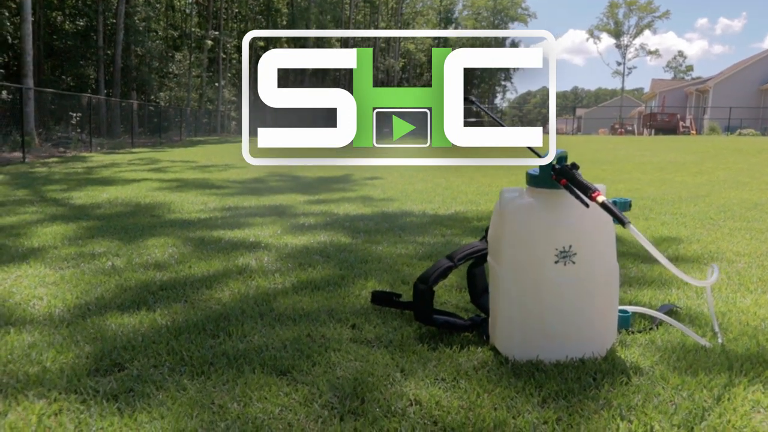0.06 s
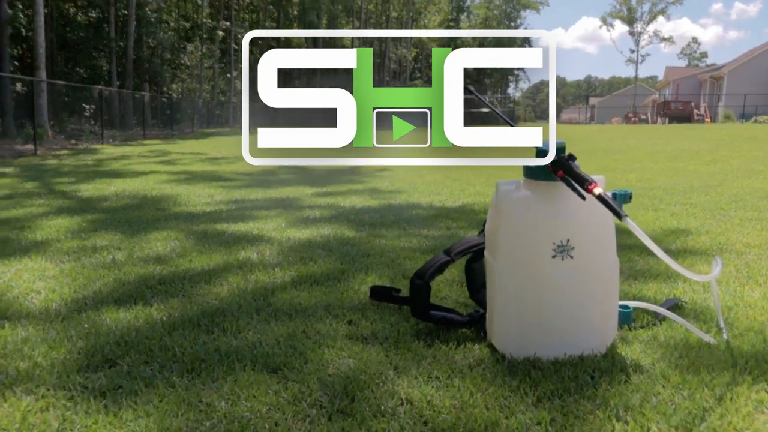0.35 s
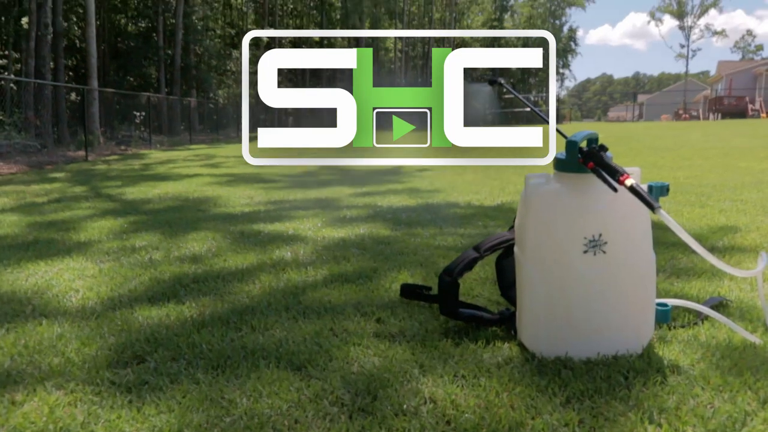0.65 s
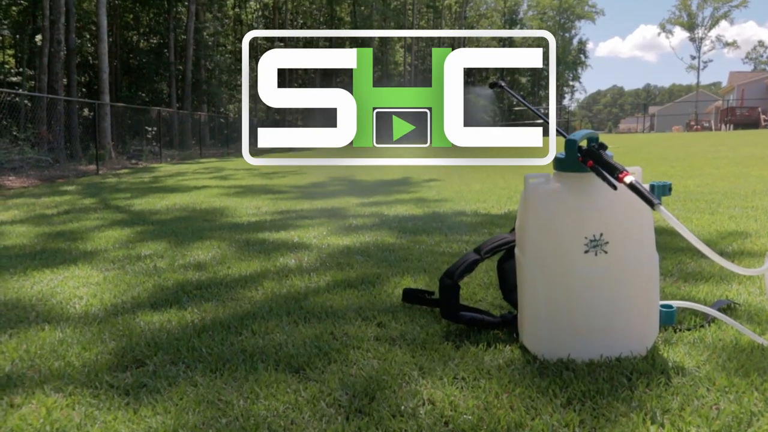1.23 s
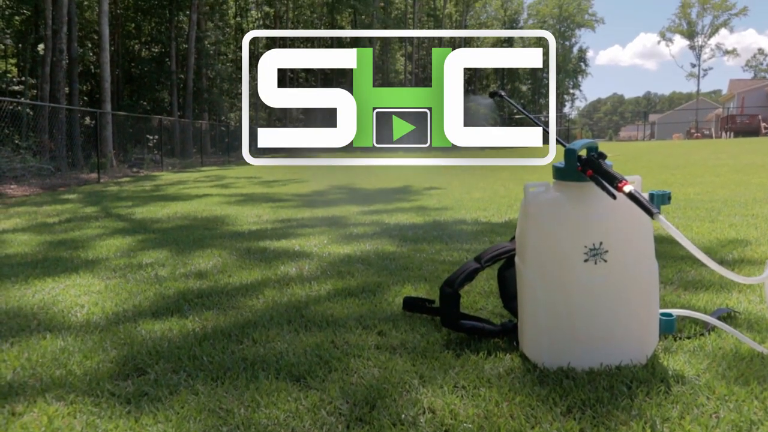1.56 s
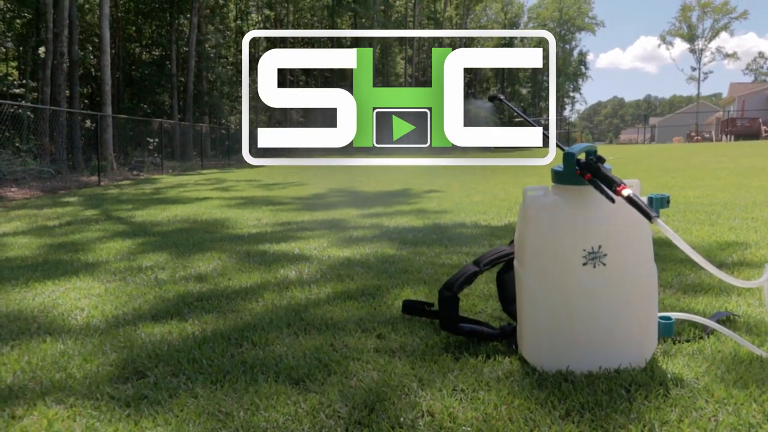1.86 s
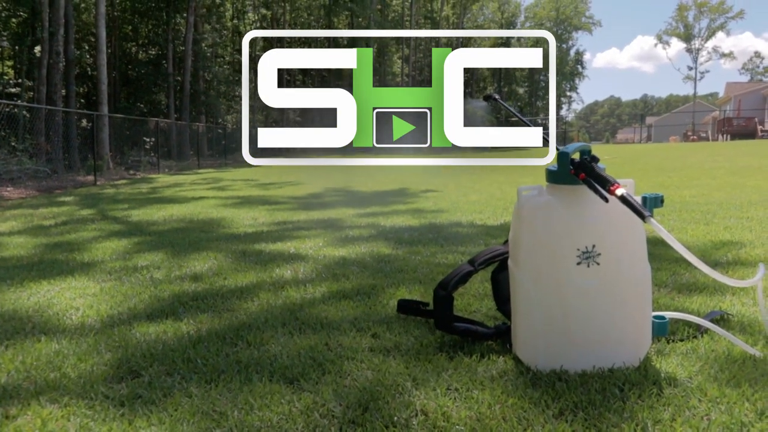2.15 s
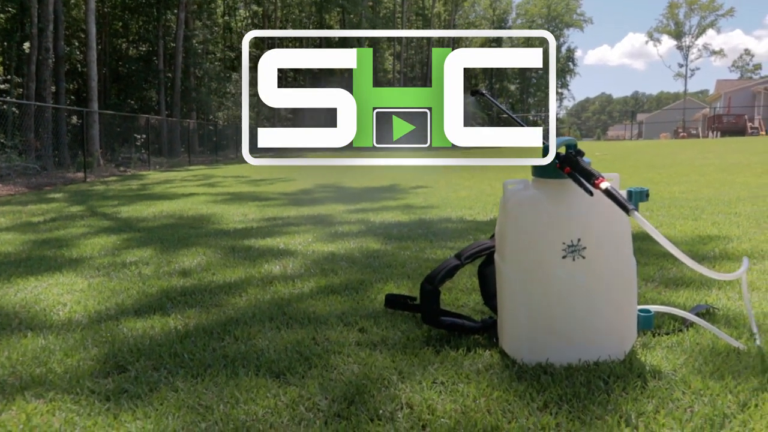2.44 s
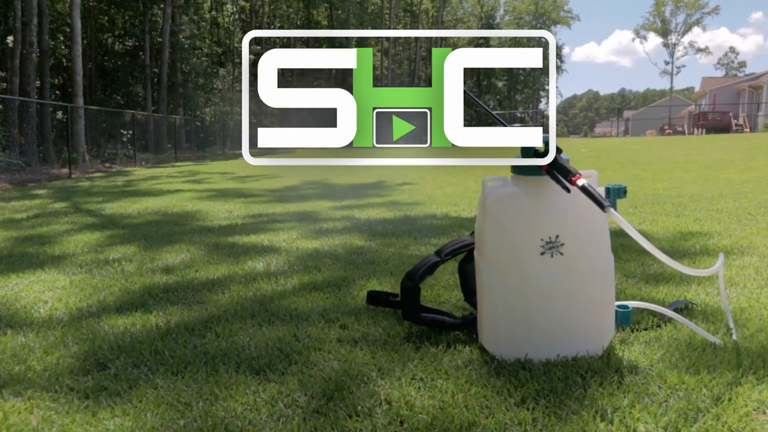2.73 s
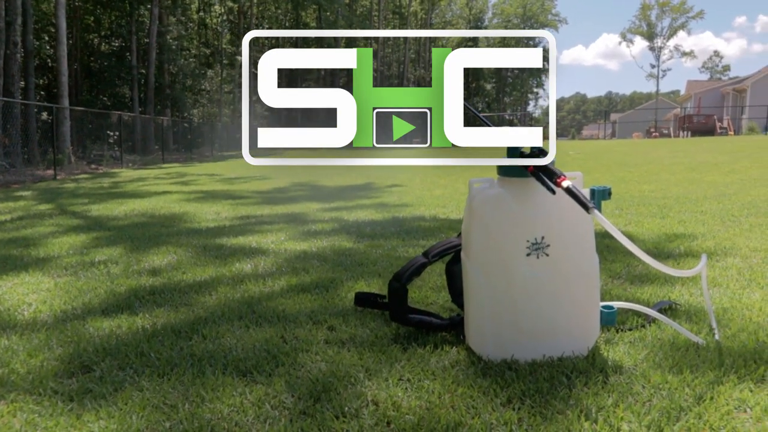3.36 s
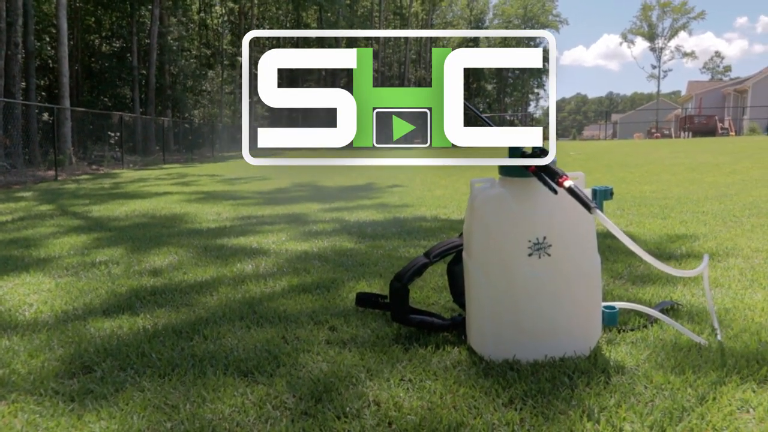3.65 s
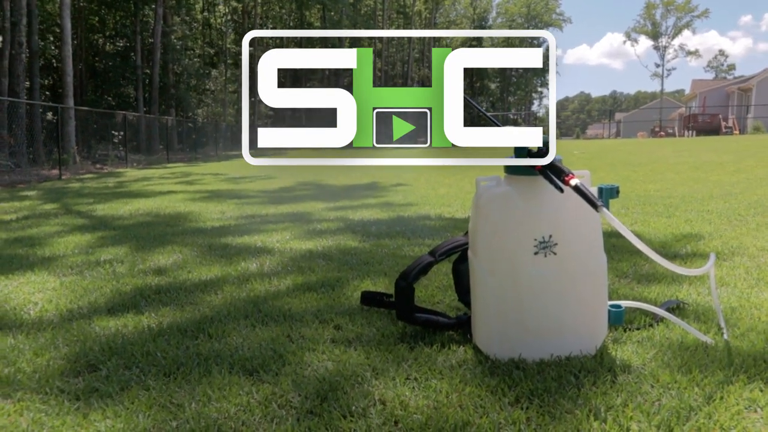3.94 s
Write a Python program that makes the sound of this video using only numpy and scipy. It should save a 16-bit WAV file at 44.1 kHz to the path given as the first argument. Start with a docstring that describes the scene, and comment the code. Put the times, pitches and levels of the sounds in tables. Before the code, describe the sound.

A few steps away on a lawn, the electric pump of a backpack sprayer hums and buzzes without a break. Under it are a soft rush of liquid, a fine hiss from the nozzle and a barely audible breeze.

```python
"""A low hum with a buzzing clatter on top: the electric diaphragm pump of a backpack sprayer,
running steadily on a lawn a few steps away. Each shaft turn shakes the plastic tank.
Liquid rushes through the valves and hisses out of the nozzle, pulsing slightly with the strokes.
A faint second hum and a light breeze lie beneath."""
import sys
import numpy as np
from scipy import signal
from scipy.fft import rfft, irfft
from scipy.io import wavfile
from scipy.ndimage import uniform_filter1d, map_coordinates

SR = 44100
rng = np.random.default_rng(int(sys.argv[2]) if len(sys.argv) > 2 else 0)


def persist_wave(psi):
    """Save psi, clipped to +-1, as 16-bit WAV."""
    counts = np.round(np.clip(psi, -1, 1) * 32767).astype(np.int16)
    wavfile.write(sys.argv[1], SR, np.atleast_2d(counts).T)


N = 176400

SHAFT_HZ, WANDER_SHARE, JITTER_SHARE = 50.754, .00054, .0018
TANK_HZ, TANK_WIDTH_HZ = 558, 62  # strongest tank resonance
HUM_DB, CLATTER_FROM_HZ = .5, 530
WAVER_DB, WAVER_FULL_HZ = 1.5, 925
SPRAY_DB, SPRAY_FROM_HZ, TREBLE_FROM_HZ = -.18, 1930, 6200
FLUTTER_DB, DROPS_PER_S, DROPS_SHARE = .34, 3200, .28

# Breeze puffs. Each row: peak time in seconds, half-width in seconds, level in dB.
GUSTS_S_DB = [(.47, .04, -54), (.61, .05, -51), (1.34, .04, -61), (1.85, .04, -57)]
# Second hum. Each row: frequency in Hz, rms level in dB.
FAINT_HUM_HZ_DB = [(83.8, -64), (167.3, -70)]
# Nozzle hiss spectrum. Each row: frequency in Hz, base density in dB per Hz.
HISS_HZ_DB = [(1800, -90), (2350, -97), (2800, -100), (3350, -99.5), (3650, -101.5), (4000, -100.5),
              (4600, -103), (5200, -104), (5550, -105), (5850, -110.5), (6300, -113), (7100, -108),
              (8400, -108.5), (10400, -112), (12600, -119.5), (15300, -121.5)]
# Lag of the lawn reflection. Each row: time in seconds, lag in milliseconds.
BOUNCE_S_MS = [(0, 1.297), (.5, 1.305), (.8, 1.296), (1.15, 1.264), (2, 1.262), (2.7, 1.247), (4, 1.242)]
# Spray treble trend. Each row: time in seconds, gain in dB.
TREBLE_S_DB = [(0, -1.5), (.3, -0.3), (.65, 0.5), (1.8, 1), (2.4, 0), (3.2, -0.2), (4, 0.5)]
# Brief treble dips. Each row: centre in seconds, depth in dB.
DIPS_S_DB = [(.079, 19), (.634, 16), (2.148, 18), (2.958, 22)]
# Spectrum of liquid in the pump. Each row: frequency in Hz, base density in dB per Hz.
RUSH_HZ_DB = [(25, -86), (70, -83), (180, -83.5), (290, -87.5), (380, -90), (560, -87), (820, -86.5),
              (1050, -91), (1270, -95.5), (1480, -94), (1740, -89.5), (1950, -98.5), (3000, -100)]
# Pump harmonics in the tank. Each row: multiple of the shaft rate, base rms level in dB.
HARMONICS_DB = [(2, -52), (3, -41), (4, -46), (5, -55), (6, -68.5), (7, -57.5), (8, -62.5), (9, -59.5),
                (10, -72), (11, -46), (12, -58.5), (13, -59.2), (14, -69.5), (15, -55), (16, -62.5),
                (17, -56.5), (18, -65), (19, -61), (20, -64), (21, -67.5), (22, -71), (24, -73),
                (26, -78.5), (27, -74.5), (28, -79.5), (29, -71.5), (30, -72), (31, -72), (32, -81),
                (34, -74.5), (35, -75), (38, -77.5), (39, -87.5), (40, -77.5), (44, -81), (52, -86),
                (53, -81.5), (60, -85)]
# Tank resonance trend. Each row: time in seconds, gain in dB.
TANK_S_DB = [(0, 1.5), (.7, -0.7), (1.5, -0.6), (2.2, -0.6), (4, -1.8)]
# Clatter trend. Each row: time in seconds, gain in dB.
CLATTER_S_DB = [(0, 0), (.9, 0.76), (2, -0.5), (3, 0.3), (4, -0.3)]


def undb(db):
    """Decibels to gain."""
    return 10 ** (np.asarray(db) / 20)


def curve(t, rows):
    """Linear interpolation of (time, value) rows."""
    return np.interp(t, *np.array(rows).T)


def walk(rate_hz):
    """Smooth random drift, spread near 1."""
    hold = max(int(SR / rate_hz), 2)
    steps = np.repeat(rng.standard_normal(N // hold + 1), hold)
    return 1.31 * uniform_filter1d(uniform_filter1d(steps, hold), hold)[:N]


def split(x, hz, order=16):
    """Bands below and above hz."""
    bins_hz = np.arange(N // 2 + 1) * SR / N
    low = irfft(rfft(x) / (1 + (bins_hz / hz) ** order), N)
    return low, x - low


def colour(x, spectrum):
    """Shape unit white noise to (Hz, dB per Hz) rows."""
    hz, db = np.array(spectrum).T
    bins_hz = np.maximum(np.arange(N // 2 + 1) * SR / N, 1)
    gain = undb(np.interp(np.log(bins_hz), np.log(hz), db))
    return irfft(rfft(x) * gain, N) * np.sqrt(SR / 2)


def breeze(t):
    """Soft puffs of air rumble."""
    rumble = split(rng.standard_normal(N), hz=60, order=4)[0]
    puffs = sum(undb(db) * np.exp(-((t - at_s) / width_s) ** 2) for at_s, width_s, db in GUSTS_S_DB)
    return rumble / rumble.std() * puffs


def faint_hum(t):
    """Weak, slightly unsteady hum at its own pitch."""
    drifted_s = t + .0008 * walk(2.85)
    return sum(np.sqrt(2) * undb(db) * np.sin(2 * np.pi * hz * drifted_s) for hz, db in FAINT_HUM_HZ_DB)


def surge(turns, depth, peak_turns=.33):
    """Flow swells twice a turn."""
    return 1 + depth * np.cos(2 * np.pi * 2 * (turns - peak_turns))


def lawn_bounce(x, t, gain=.3):
    """A ground reflection hollows the hiss; its notches shift as the listener moves."""
    lag_s = curve(t, BOUNCE_S_MS) / 1000
    return x + gain * map_coordinates(x, [(t - lag_s) * SR], mode="mirror")


def spray(t, turns, dip_width_s=.009, mid_dip_share=.33):
    """Jet noise and fine droplets leave the nozzle; the treble dips briefly, the mids less."""
    drops = rng.standard_normal(N) * (rng.random(N) < DROPS_PER_S / SR)
    jet = np.sqrt(1 - DROPS_SHARE) * rng.standard_normal(N) + np.sqrt(DROPS_SHARE) * drops / drops.std()
    jet = jet * surge(turns, depth=.15) * undb(FLUTTER_DB * walk(25.4))
    hiss = lawn_bounce(colour(jet, HISS_HZ_DB), t)
    hiss = split(hiss, SPRAY_FROM_HZ)[1]
    mid, treble = split(hiss, TREBLE_FROM_HZ)
    dip_db = -sum(db * np.exp(-((t - at_s) / dip_width_s) ** 2) for at_s, db in DIPS_S_DB)
    treble_db = curve(t, TREBLE_S_DB) + dip_db
    return undb(SPRAY_DB) * (mid * undb(mid_dip_share * dip_db) + treble * undb(treble_db))


def churn(turns):
    """Liquid rushes through the valves with each stroke."""
    flow = rng.standard_normal(N) * surge(turns, depth=.22)
    return split(colour(flow, RUSH_HZ_DB), SPRAY_FROM_HZ)[0]


def push_phases(tries=16, size=256):
    """The pump pushes smoothly: of several random phase sets, the one with the least peaky force."""
    multiples, db = np.array(HARMONICS_DB).T
    phases = 2 * np.pi * rng.random((tries, len(HARMONICS_DB)))
    spectra = np.zeros((tries, size), complex)
    spectra[:, np.rint(multiples).astype(int)] = undb(db) * np.exp(1j * phases)
    force = irfft(spectra, axis=1)
    return phases[np.argmin(np.mean(force ** 4, axis=1))]


def clatter_phases(centre_turns=.15, width_turns=.25, size=256):
    """Knocks bunch into one burst a turn; returns its phase at each harmonic."""
    offset_turns = (np.arange(size) / size - centre_turns + .5) % 1 - .5
    burst = rng.standard_normal(size) * np.exp(-(offset_turns / width_turns) ** 2)
    return np.angle(rfft(burst))


def pump(t, turns):
    """Push and clatter repeat each turn and shake the tank; high harmonics waver most."""
    ring_db, clatter_db = curve(t, TANK_S_DB), curve(t, CLATTER_S_DB)
    clatter_rad = clatter_phases()
    tank = np.zeros(N)
    for (multiple, db), push_rad in zip(HARMONICS_DB, push_phases()):
        hz = multiple * SHAFT_HZ
        if hz > CLATTER_FROM_HZ:
            phase_rad, db = clatter_rad[multiple], db + clatter_db
        else:
            phase_rad, db = push_rad, db + HUM_DB
        db = db + ring_db * np.exp(-((hz - TANK_HZ) / TANK_WIDTH_HZ) ** 2)
        db = db + WAVER_DB * min(hz / WAVER_FULL_HZ, 1) ** 2 * walk(7.16)
        tank += np.sqrt(2) * undb(db) * np.cos(2 * np.pi * multiple * turns + phase_rad)
    return tank


def scene():
    """One shaft drives pump, churn and spray, over the faint hum and breeze. Mono."""
    t = np.arange(N) / SR
    shaft_hz = SHAFT_HZ * (1 + WANDER_SHARE * walk(1.963) + JITTER_SHARE * walk(60))
    turns = np.cumsum(shaft_hz) / SR
    return (pump(t, turns) + churn(turns) + spray(t, turns) + faint_hum(t) + breeze(t))[None]


def record(dry, top_hz=15700):
    """Steep low-pass."""
    return signal.sosfilt(signal.ellip(10, .1, 80, top_hz, fs=SR, output="sos"), dry)


dry = scene()
out = record(dry)
persist_wave(out)
```